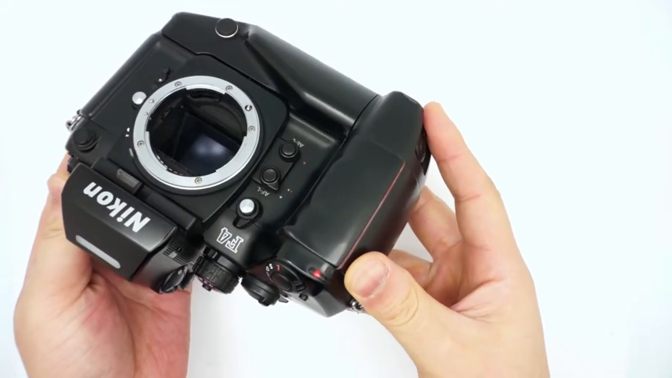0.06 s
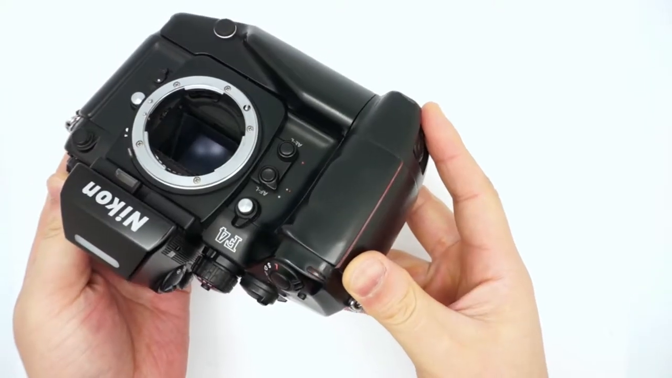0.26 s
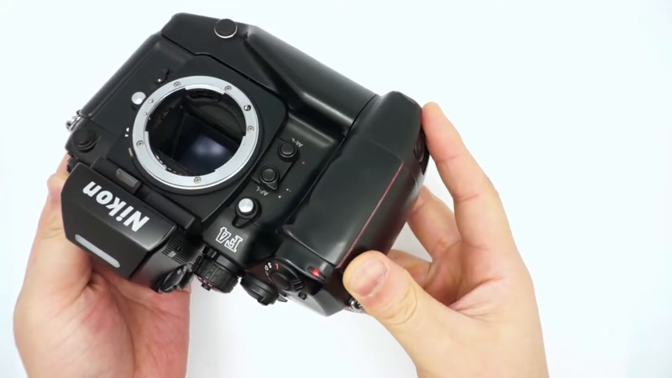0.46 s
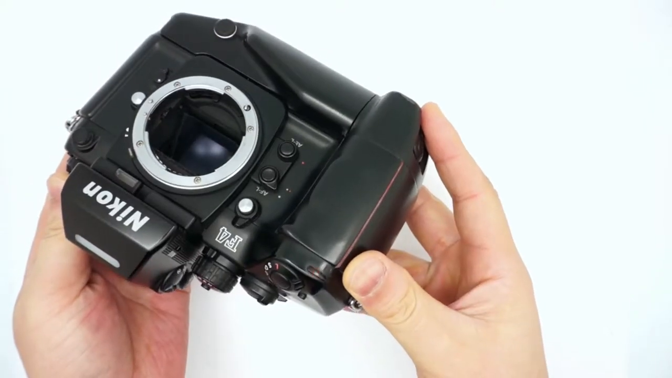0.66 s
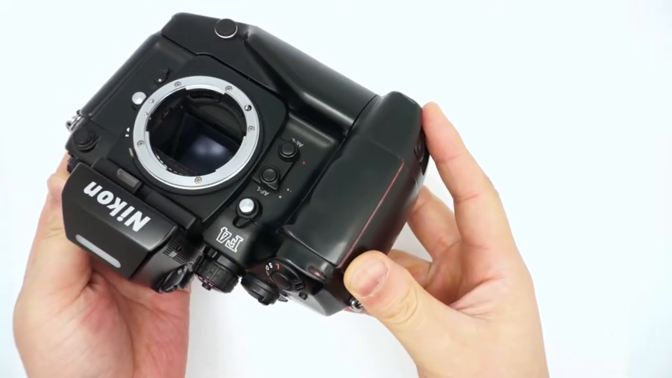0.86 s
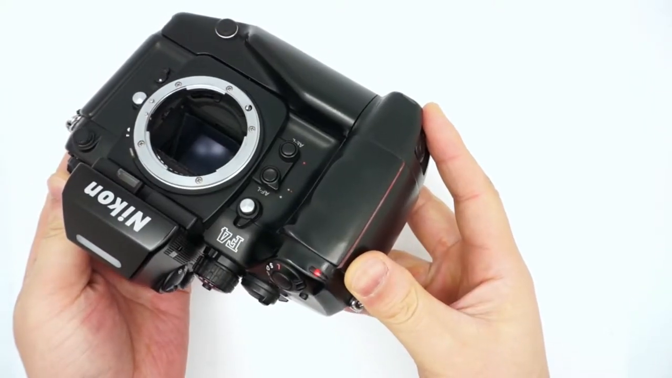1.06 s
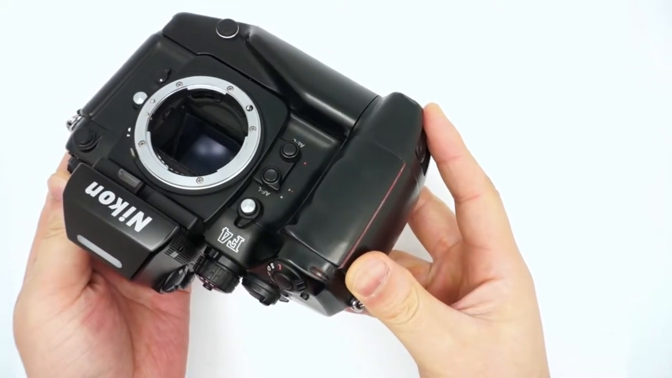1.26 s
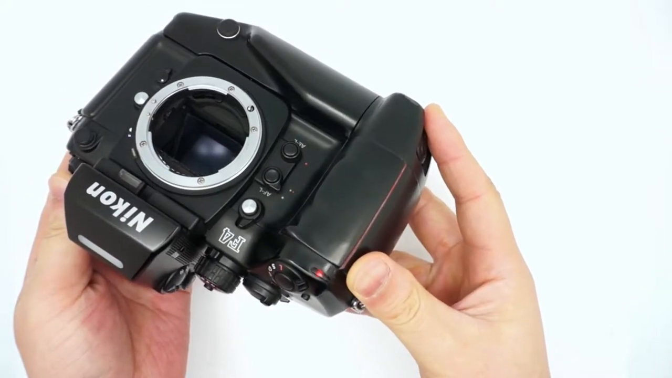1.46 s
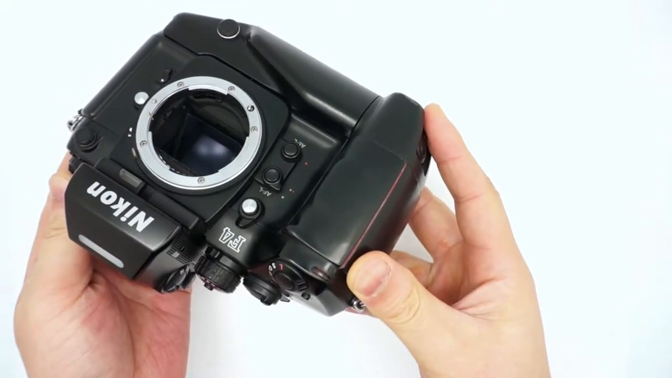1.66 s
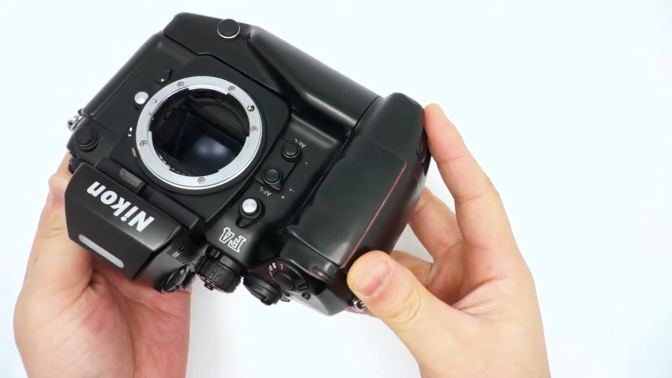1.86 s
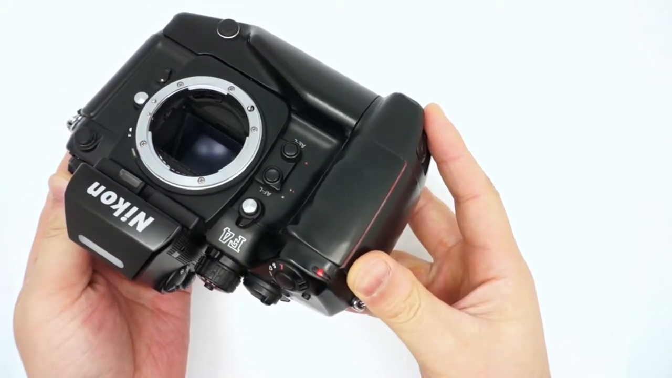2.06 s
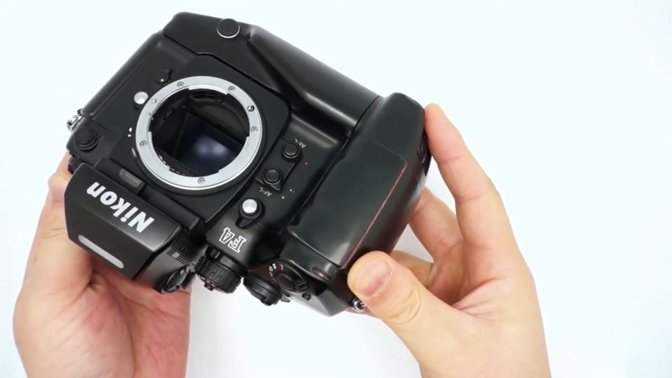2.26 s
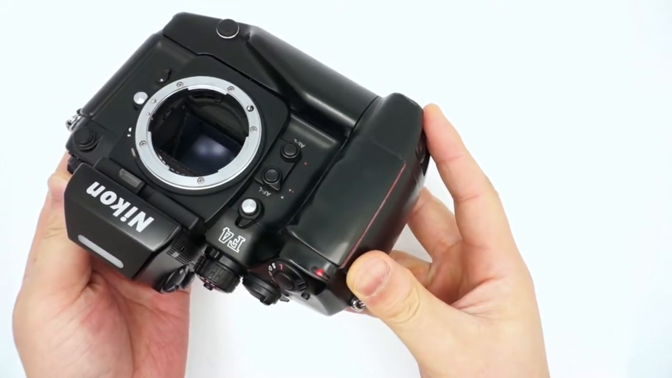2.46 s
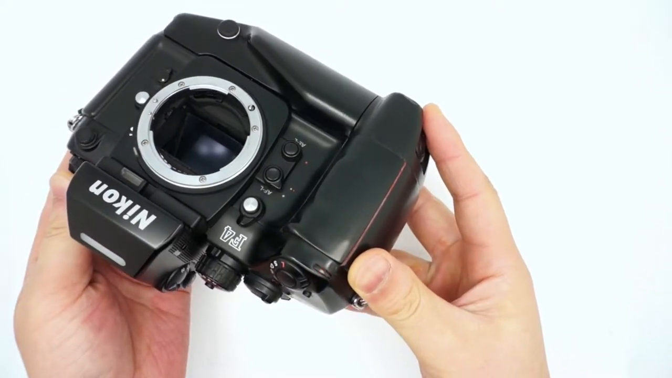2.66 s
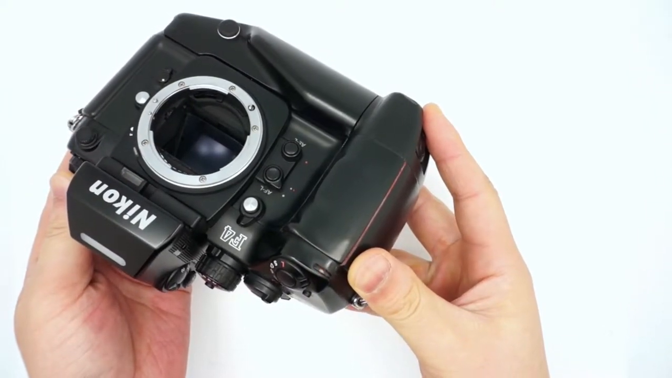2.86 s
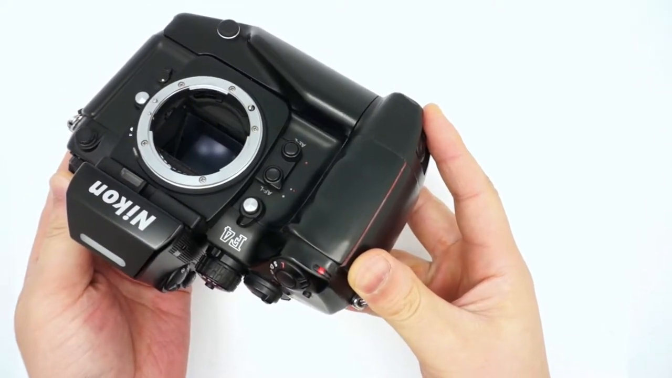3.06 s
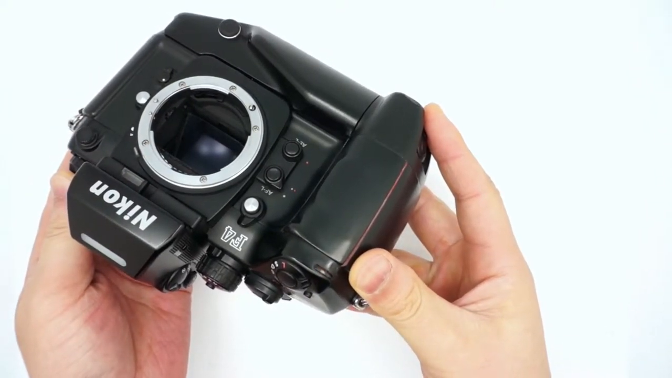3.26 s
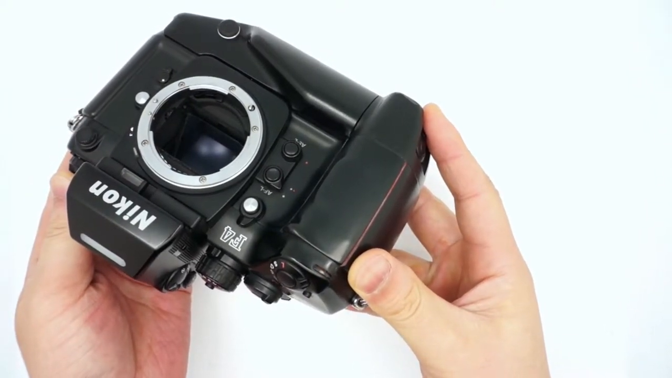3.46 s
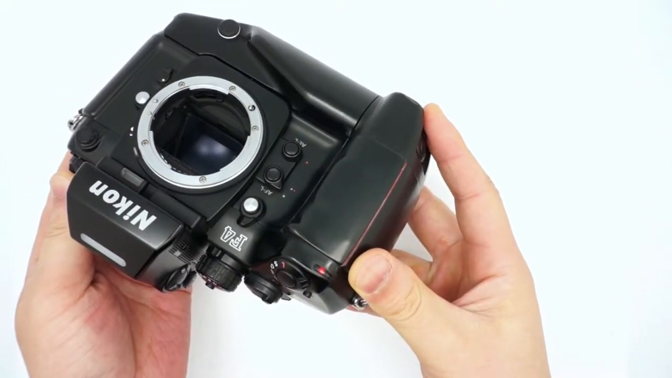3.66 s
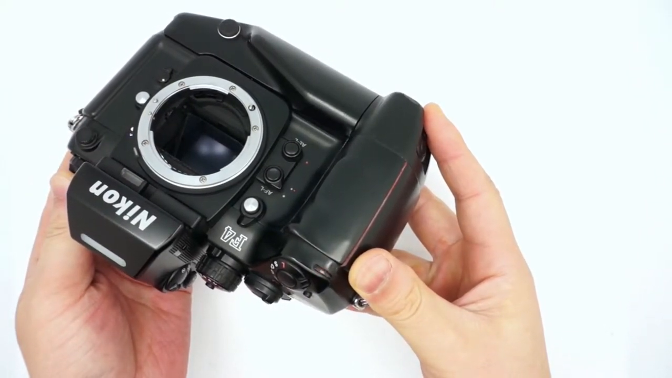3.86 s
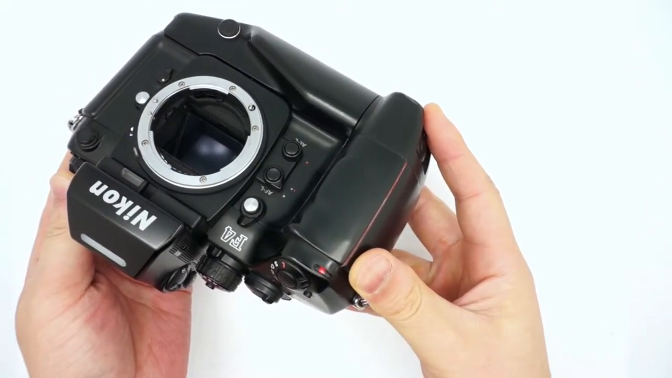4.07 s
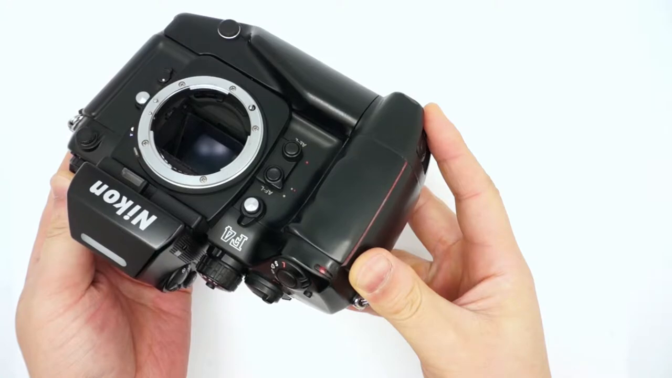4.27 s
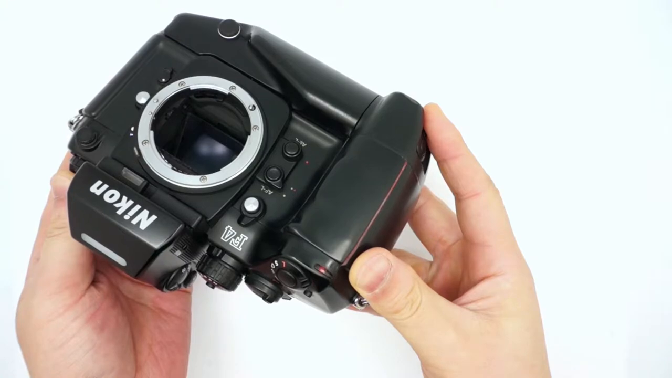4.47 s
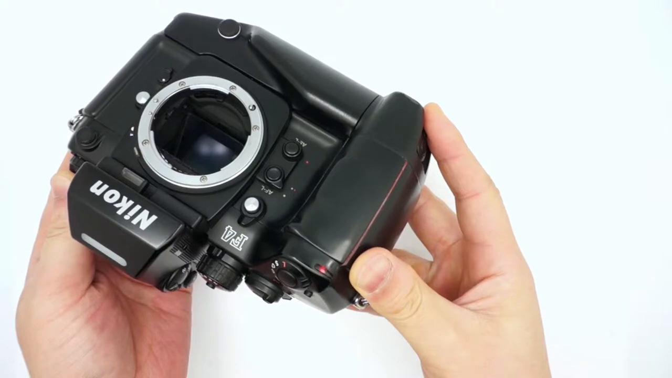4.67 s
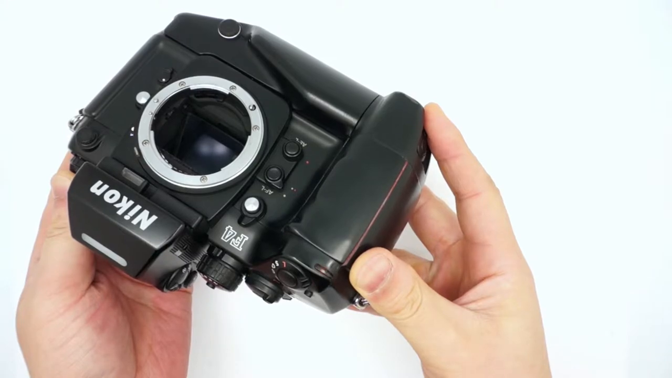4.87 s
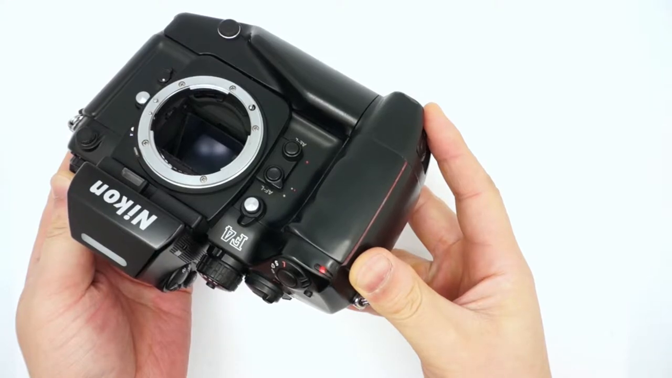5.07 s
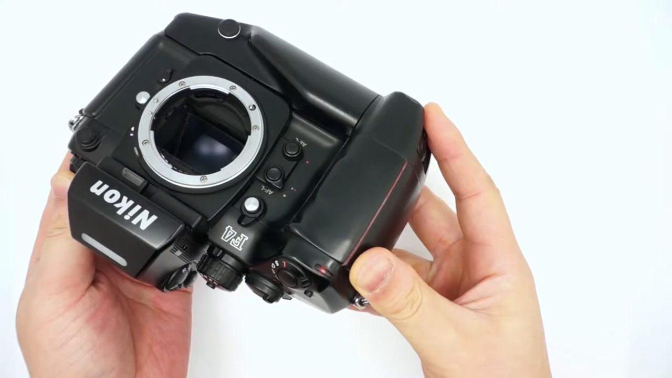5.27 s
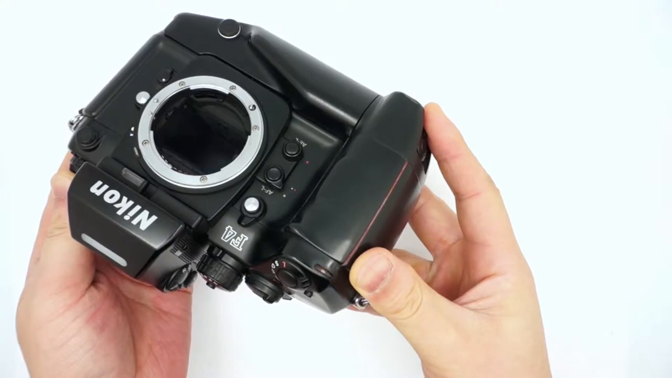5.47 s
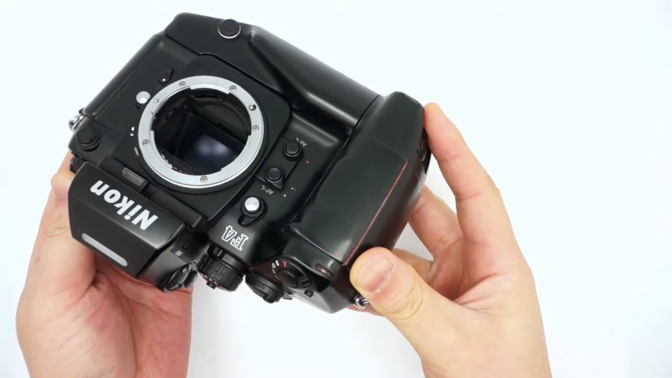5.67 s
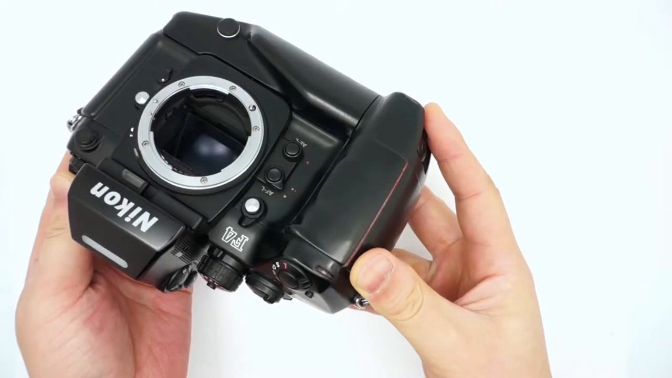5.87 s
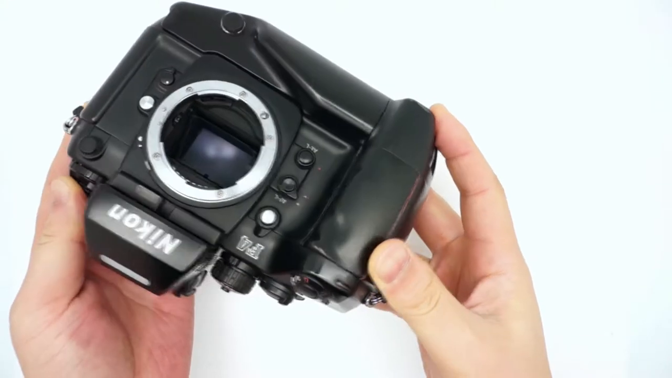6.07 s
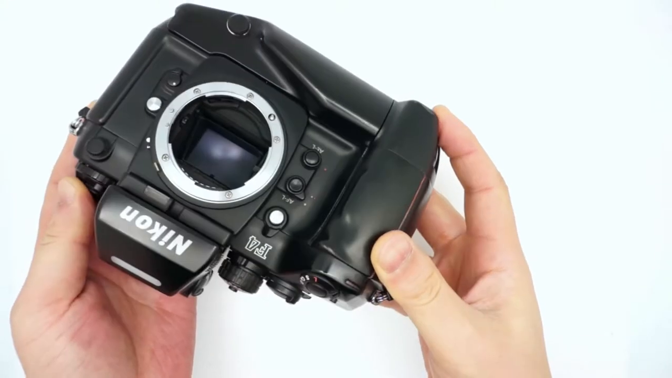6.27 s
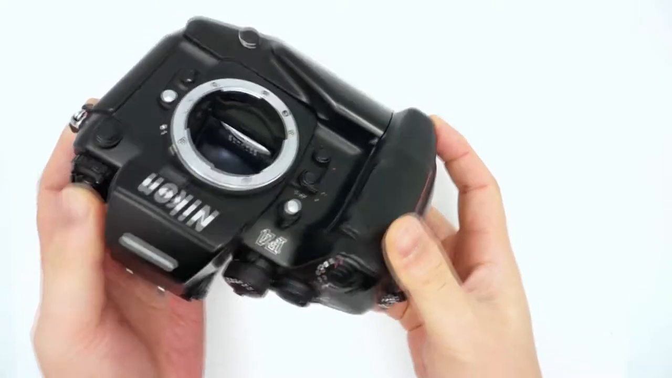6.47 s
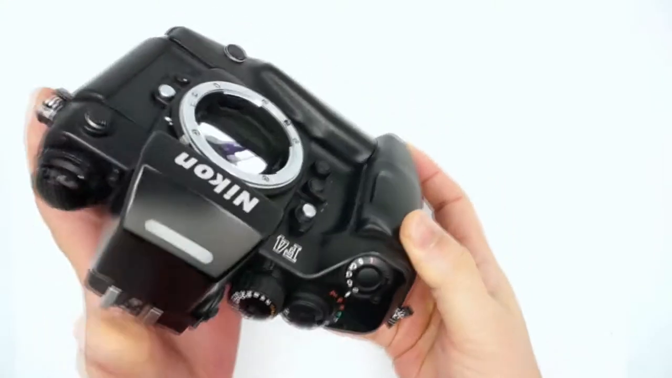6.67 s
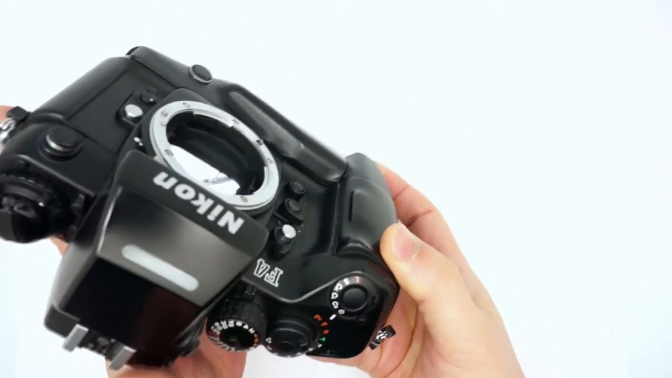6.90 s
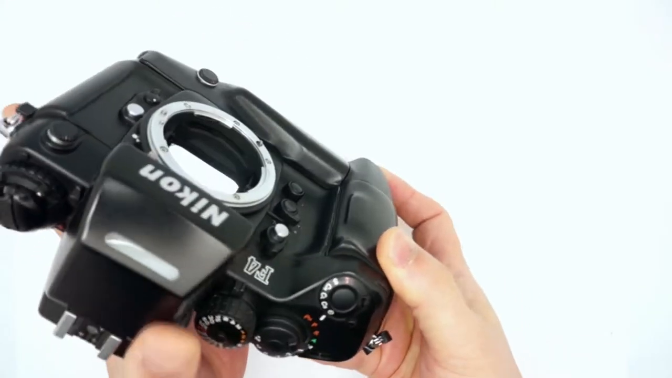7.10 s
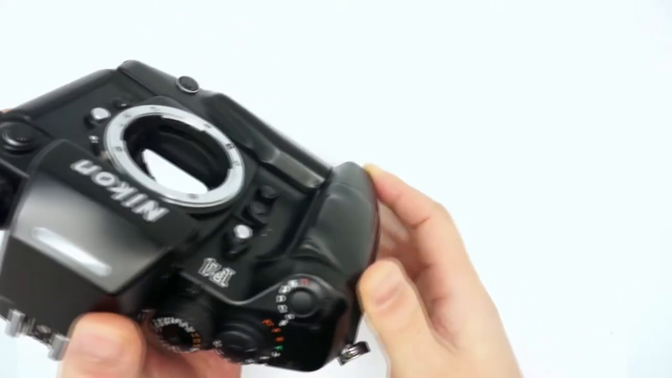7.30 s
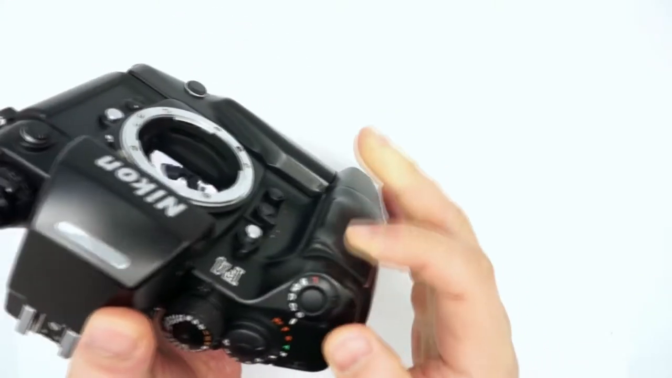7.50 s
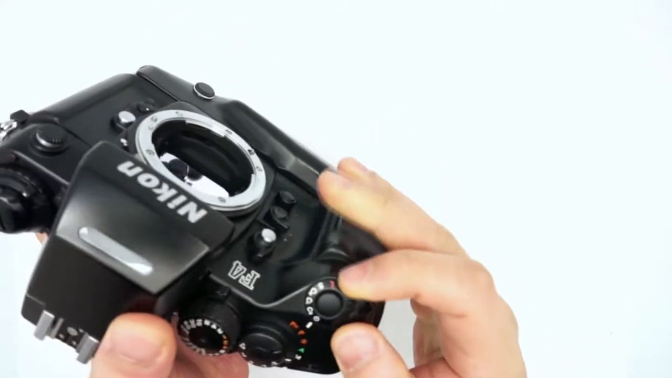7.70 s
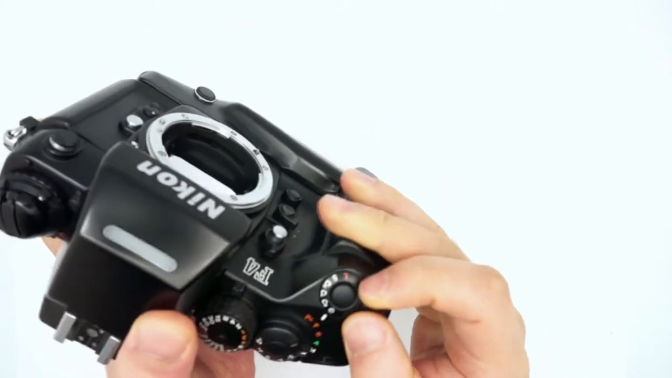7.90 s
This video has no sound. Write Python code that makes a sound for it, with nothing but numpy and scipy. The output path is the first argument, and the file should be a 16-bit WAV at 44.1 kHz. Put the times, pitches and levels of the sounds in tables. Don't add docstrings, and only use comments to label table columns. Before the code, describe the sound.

Quiet humming room; after over five seconds a film camera fires once with a sharp mechanical crack and whirr, then small clicks, rubs and a thud.

```python
import sys
import numpy as np
from scipy import signal
from scipy.fft import rfft, irfft, next_fast_len
from scipy.io import wavfile
from scipy.ndimage import uniform_filter1d, map_coordinates

SR = 44100
rng = np.random.default_rng(int(sys.argv[2]) if len(sys.argv) > 2 else 0)


def unload_audio(sound):
    columns = np.transpose(np.atleast_2d(sound))
    steps = np.round(np.clip(columns, -1, 1) * 32767)
    wavfile.write(sys.argv[1], SR, steps.astype(np.int16))


def to_linear_factor(level_db):
    exponent = np.asarray(level_db, float) / 20
    return 10 ** exponent


N = 350154

# pitch_hz [Hz], level_db [dB per Hz]
METAL = [(300, -26), (600, -8), (1500, -1), (2100, -4.5), (2900, 0.5), (4000, -2), (5500, -4.5), (7000, -6),
         (10000, -3), (15500, -7.5), (16500, -40)]
# pitch_hz [Hz], side_minus_mid_db [dB]
SOFT_SPREAD = [(60, -30), (110, -36.5), (200, -17), (380, -8), (700, -3), (1290, -4), (2380, -5),
               (3600, -6), (3950, -73), (16000, -120)]


def unit(x):
    return x / np.sqrt(np.mean(x ** 2) + 1e-20)


def along(points, hz):
    f, v = np.transpose(points)
    return np.interp(np.log(hz + 1), np.log(f + 1), v)


def wobble(rate):
    knots = rng.standard_normal(int(N * rate / SR) + 4)
    return map_coordinates(knots, [np.arange(N) * rate / SR])


def filtered(x, response):
    m = next_fast_len(x.shape[-1] + 4096)
    spectrum = rfft(x, m) * response(np.fft.rfftfreq(m, 1 / SR))
    return irfft(spectrum, m)[..., :x.shape[-1]]


def peak(hz, width):
    return lambda f: 1j * f * width / (hz * hz - f * f + 1j * f * width)


def rush(spectrum, spread, count=N):
    def response(hz):
        return to_linear_factor(along(spectrum, hz)) * [hz ** 0, to_linear_factor(along(spread, hz))]

    mid, side = filtered(rng.standard_normal((2, count)), response)
    return np.array([mid + side, mid - side]) / np.std(mid)


def swell(s, hold_s, db, rise_s, fall_s):
    t = np.arange(N) / SR - s
    away = np.maximum(-t / rise_s, (t - hold_s) / fall_s)
    return to_linear_factor(db - 20 * np.maximum(away, 0))


def blow(s, db, modes):
    t, out = np.arange(SR) / SR, np.zeros(N + SR)
    ring = sum(to_linear_factor(level - 60 * t / t60) * np.sin(2 * np.pi * hz * t) for hz, level, t60 in modes)
    out[round(s * SR):][:SR] = to_linear_factor(db) * (1 - np.exp(-t / 0.003)) * ring
    return out[:N]


def contacts(events, bright_db, parts_db):
    # pitch_hz [Hz], width_hz [Hz], level_db [dB]
    small_parts = [(1026, 22, 4.5), (1430, 80, -15), (1660, 40, 4.5), (2330, 77, 1.5), (2850, 10, -4.5),
                   (3500, 45, -3.5), (5180, 140, -6.5), (5580, 90, 4.5), (6330, 51, -18.5), (6820, 92, 3.5),
                   (8080, 90, -0.5), (9315, 77, -2.5), (11400, 150, -4)]
    # pitch_hz [Hz], side_minus_mid_db [dB]
    near_spread = [(60, -28), (110, -23), (200, -29), (380, -17), (700, -12), (1290, -14.5), (2380, -11.5),
                   (4400, -10.5), (8120, -23), (15000, -26)]
    out, t = np.zeros((2, N + SR)), np.arange(SR // 6) / SR
    mean_db = np.mean(events, axis=0)[1]
    for s, db, hz, ring_db, t60 in events:
        tilt_db = bright_db + 1.2 * np.log2(hz / 4000) + .15 * (db - mean_db)
        colour = [(f, level + tilt_db * np.log2(f / 4000)) for f, level in METAL]

        crack_and_rattle = to_linear_factor(-60 * t / t60) + 0.75 * np.exp(-t / .002)
        shape = (1 - np.exp(-t / 0.00077)) * crack_and_rattle
        burst = shape * rush(colour, near_spread, count=len(t))

        part = filtered(burst, peak(hz, .05 * hz + 40))
        part = part * np.std(burst) / np.std(part)

        chance_db = 4 * rng.standard_normal(len(small_parts))
        shared = filtered(burst, lambda f: sum(
            to_linear_factor(level + chance) * peak(centre, width)(f)
            for (centre, width, level), chance in zip(small_parts, chance_db)))

        sound = burst + to_linear_factor(ring_db) * part + to_linear_factor(parts_db) * shared
        out[:, round(s * SR):][:, :len(t)] += to_linear_factor(db - 10) * sound
    return out[:, :N]


def shutter():
    # start_s [s], level_db [dB peak], pitch_hz [Hz, ringing part], ring_db [dB], t60_s [s]
    strikes = [(5.5140, -16, 5500, -4, .1), (5.5169, 1.5, 5460, -9, 0.021), (5.5204, -8, 7900, -4, 0.079),
               (5.5464, -20, 12800, 0, 0.045), (5.5538, -14, 3480, 5, 0.09), (5.5697, -4, 5100, -8, .04),
               (5.5744, -7.5, 6900, 1.5, .07), (5.5814, -4, 4640, 2.5, 0.03), (5.5894, -14, 5180, 3, .1),
               (5.604, -22.5, 6100, 6, 0.28), (5.6150, -15.5, 1600, -3, 0.1),
               (5.6191, -14.5, 2920, -7, 0.13), (5.6351, -1.5, 6940, 1.5, 0.03),
               (5.657, -10.5, 5800, 4.5, 0.07), (5.6934, -10.5, 2430, -15, 0.14),
               (5.7034, -2.5, 1550, -5, 0.08), (5.7084, -6.5, 1630, 3, 0.044), (5.7154, -23, 1400, 7, 0.13)]
    return contacts(strikes, bright_db=-1.5, parts_db=2)


def mirror_box():
    # pitch_hz [Hz], level_db [dB], t60_s [s]
    box_modes = [(716, -14, .25), (940, -25, .4), (1090, -20, .4), (1233, -14, 1.3), (1308, -25, 4),
                 (1572, -5, .3), (2180, -24, .5), (2606, -25, .35)]
    return blow(5.706, -22, box_modes) * to_linear_factor([[-2.5], [2.5]])


def gears():
    # pitch_hz [Hz], level_db [dB]
    whine = [(2834, -3.5), (3018, 2), (6083, -13), (9315, -9)]
    # start_s [s],
    # hold_s [s], level_db [dB], rise_s [s], fall_s [s]
    whirr = (5.518, .2, -24.5, .004, .023)
    room_tail = (5.74, .003, -48, .01, .25)
    wind_on = (5.632, .016, -22, .035, .05)
    tones = sum(to_linear_factor(db) * unit(filtered(rng.standard_normal(N), peak(hz, 26))) for hz, db in whine)
    chatter = to_linear_factor(2.2 * wobble(300)) * rush(METAL, SOFT_SPREAD)
    return (swell(*whirr) + swell(*room_tail)) * chatter + swell(*wind_on) * tones


def knocks():
    # start_s [s], level_db [dB peak], pitch_hz [Hz]
    shell_knocks = [(5.517, -13, 1430), (5.553, -12.5, 385), (5.553, -11.5, 655), (5.571, -14, 1730),
                    (5.617, -20, 661), (5.66, -19, 660), (5.703, -9, 672), (6.482, -25, 660),
                    (6.525, -11, 642), (6.596, -17.5, 633), (6.937, -11, 710), (7.266, -16.5, 710),
                    (7.348, -18.5, 660), (7.392, -20, 620), (7.425, -3.5, 385)]

    def pair(hz):
        t60 = .082 * (650 / hz) ** .45
        return [(.97 * hz, -4, t60), (1.04 * hz, -8, 0.91 * t60)]

    return sum(blow(s, db, pair(hz)) for s, db, hz in shell_knocks) * to_linear_factor([[-.8], [.8]])


def handling_ticks():
    # start_s [s], level_db [dB peak], pitch_hz [Hz, ringing part], ring_db [dB], t60_s [s]
    tick_events = [(6.131, -34, 7100, -10, .1), (6.4802, -32, 1660, -9, 0.28), (6.5247, -29, 1420, -3, .05),
                   (6.5952, -24, 1270, -1.5, .09), (6.756, -17, 4200, -3, 0.07),
                   (6.757, -21, 10600, 5, 0.084), (6.758, -19, 6400, 4, 0.073),
                   (6.795, -31, 4020, 2.5, .15), (6.811, -34, 4100, 1.5, .12),
                   (6.826, -29.5, 4230, 5, 0.14), (6.837, -22, 6300, 2.5, .1),
                   (6.8389, -13.5, 4220, -3, 0.086), (6.93, -31, 2980, -3, .1), (6.938, -21, 15000, 5, .05),
                   (7.1944, -33, 4200, -5, .1), (7.2644, -28, 1560, 10.5, 0.08),
                   (7.2874, -28, 4300, -9, 0.071)]
    return contacts(tick_events, bright_db=.6, parts_db=0.5)


def bumps():
    # start_s [s], level_db [dB peak], pitch_hz [Hz, ringing part], ring_db [dB], t60_s [s]
    bump_events = [(6.465, -38, 1700, -3, 0.18), (6.5098, -33, 3500, -2, 0.08),
                   (6.9366, -12, 1300, -1.5, .09), (6.939, -16, 4300, -3, .08),
                   (7.1633, -25, 2200, -4, 0.11), (7.348, -31, 720, 6, .05), (7.4121, -8, 4100, -10, 0.096),
                   (7.4242, -22, 2400, -4, 0.15), (7.4554, -26, 4800, -2.5, .07),
                   (7.494, -37, 5000, -2.5, 0.12)]
    return contacts(bump_events, bright_db=-6, parts_db=-1.5)


def palm_thud():
    # pitch_hz [Hz], level_db [dB], t60_s [s]
    body_modes = [(107.4, 1, 0.14), (140, 0, .12), (250, -1.5, 0.23), (660, -8.5, 0.088),
                  (1112, -19, 0.098), (1600, -28, 0.059)]
    thud = blow(7.4125, -4, body_modes) + blow(7.4225, -4.5, body_modes)
    return thud * to_linear_factor([[-.6], [.6]])


def fingers():
    # start_s [s], hold_s [s], level_db [dB], rise_s [s], fall_s [s]
    slides = [
        (6.1, .07, -43.5, .22, .35),
        (6.56, .003, -37.5, .055, .2),
        (6.84, .003, -33, .045, .12),
        (7.37, .003, -34, .15, .1),
        (7.9, .04, -44.5, .048, .05),
    ]
    # pitch_hz [Hz], level_db [dB per Hz]
    skin = [(600, -2), (2000, 0.5), (5000, -2.5), (10000, -3), (16000, -2)]
    catches = to_linear_factor(1.1 * wobble(60))
    return sum(swell(*row) for row in slides) * catches * rush(skin, SOFT_SPREAD)


def puffs():
    # pitch_hz [Hz], level_db [dB per Hz]
    puff_colour = [(400, -32), (750, 3), (1100, -12), (1700, -3), (2250, 9), (2800, 1), (5000, -24),
                   (9000, -50)]
    puff_levels = [-45, -39.5, -43, -38]
    first_s, every_s, rise_s, fall_s = .27, 2.003, .085, .09
    gain = sum(swell(first_s + k * every_s, 0, db, rise_s, fall_s) for k, db in enumerate(puff_levels))
    return gain * rush(puff_colour, SOFT_SPREAD)


def room():
    # [Hz; for the hum, its phase drift]
    hum = [(193.3, -21.5, 0.5), (40.5, -34, 3.9), (59, -39.5, 3.3), (385, -40.5, 26.6), (620, -55.5, 88),
           (1350, -52, 45), (5480, -59, 76), (14750, -67, 250), (15600, -64, 200)]
    # pitch_hz [Hz], level_db [dB per Hz]
    rumble_colour = [(15, -33), (30, -17), (70, -3), (88, -8.5), (100, -5), (130, -3), (160, 3), (185, -8),
                     (210, -11.5), (245, -8.5), (320, -21), (400, -13), (460, -33), (700, -65)]
    # pitch_hz [Hz], level_db [dB per Hz]
    air_colour = [(260, -47), (450, -2.5), (539, -9), (618, -1.5), (798, -8), (1000, -4), (1200, -6),
                  (1390, -3), (1720, -15.5), (2330, -16), (2550, -17), (13800, -17.5), (15100, -13),
                  (15800, -16), (16500, -29)]
    t = np.arange(N) / SR
    (hz, db, drift), *fuzzy = hum
    level = np.sqrt(2) * to_linear_factor(db + 0.75 * wobble(2.4))
    tone = level * np.sin(2 * np.pi * hz * t + drift * .3 * wobble(2.57))

    def duct(hz, db, width):
        share = np.sqrt(SR / (np.pi * width))
        return lambda f: to_linear_factor(db) * share * peak(hz, width)(f)

    ducts = filtered(rng.standard_normal(N), lambda f: sum(duct(*row)(f) for row in fuzzy))
    rumble = to_linear_factor(-23.5 + 0.72 * wobble(1.88)) * rush(rumble_colour, SOFT_SPREAD)
    hiss = to_linear_factor(-38.5 + .3 * wobble(1.5)) * rush(air_colour, SOFT_SPREAD)
    return tone + ducts + rumble + hiss


def gain_db():
    # start_s [s], level_db [dB gain]
    ducks = [
        (5.514, -22),
        (5.635, -25.5),
        (5.705, -12.5),
        (6.76, -1),
        (6.94, 6),
        (7.418, -8.5),
    ]
    t = np.arange(N) / SR
    dips = [db * np.exp(-np.abs(t - s) / 0.56) * (t > s) for s, db in ducks]
    return uniform_filter1d(np.min(dips, axis=0), round(0.0092 * SR))


def scene():
    firing = shutter() + mirror_box() + gears()
    handling = handling_ticks() + bumps() + palm_thud() + fingers()
    camera = firing + handling + knocks()
    return camera / to_linear_factor(gain_db()) + puffs() + room()


def band_limit(x):
    return signal.sosfilt(signal.butter(12, 16820, fs=SR, output="sos"), x)


def record(dry):
    x = dry * to_linear_factor(gain_db())
    ceiling = x / (1 + np.abs(x) ** 6) ** (1 / 6)
    mix = filtered(ceiling, lambda hz: hz < 15830)
    return band_limit(mix)


dry = scene()
out = record(dry)
unload_audio(out)
```